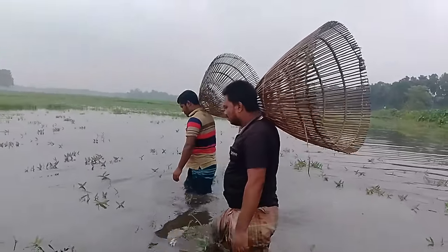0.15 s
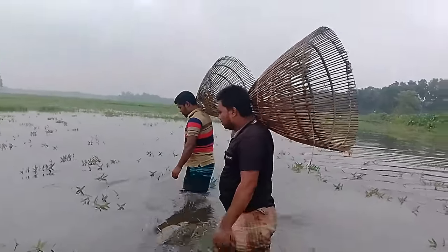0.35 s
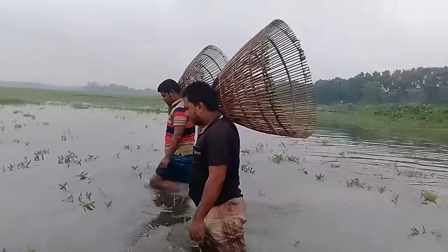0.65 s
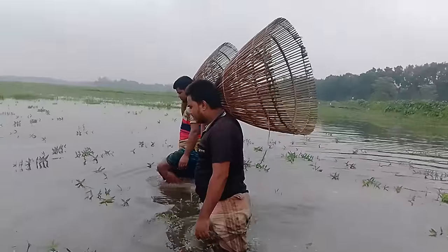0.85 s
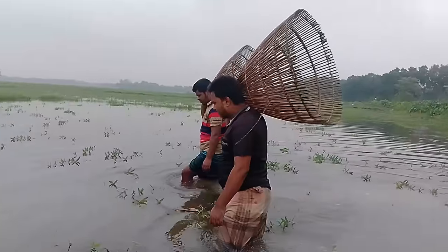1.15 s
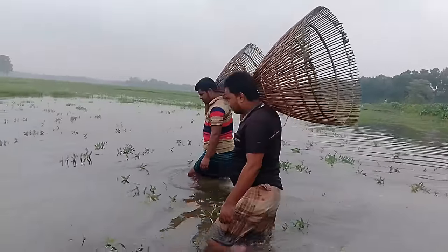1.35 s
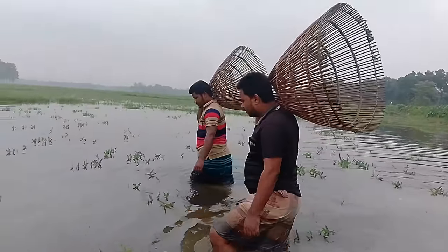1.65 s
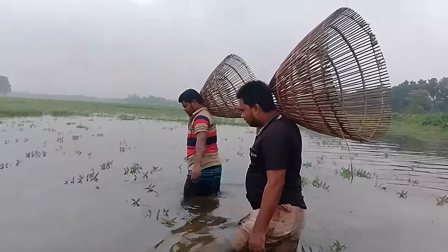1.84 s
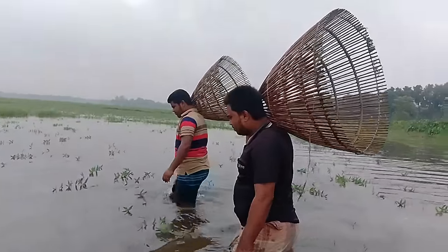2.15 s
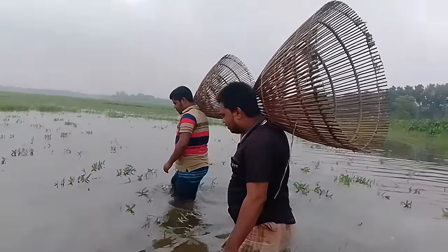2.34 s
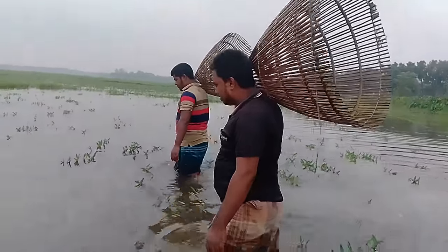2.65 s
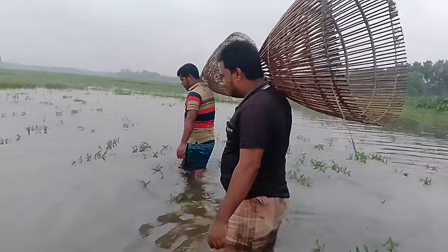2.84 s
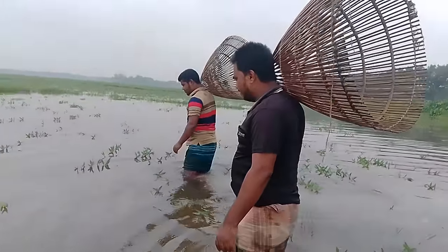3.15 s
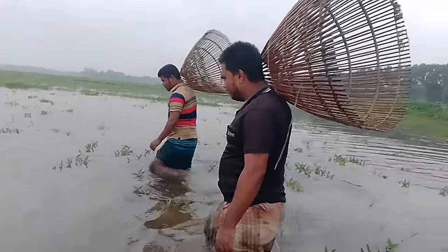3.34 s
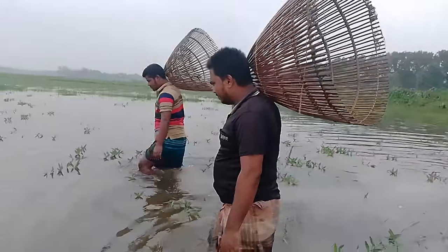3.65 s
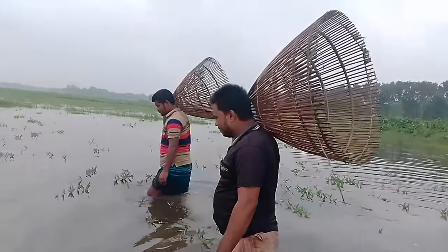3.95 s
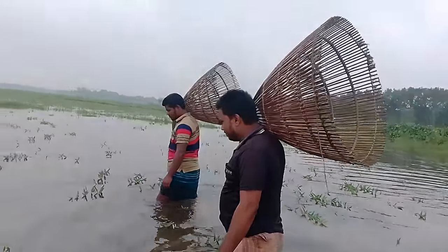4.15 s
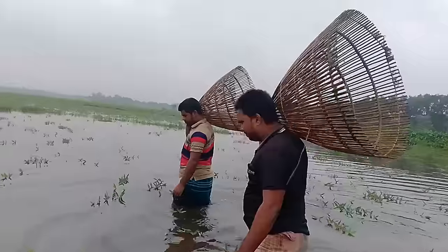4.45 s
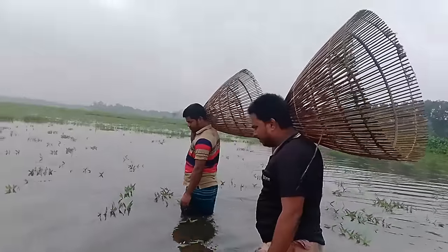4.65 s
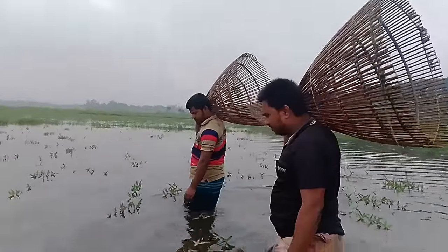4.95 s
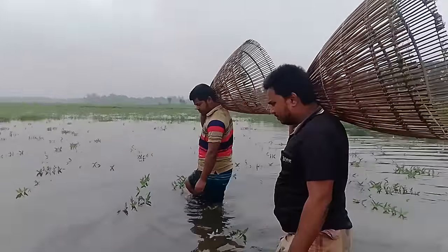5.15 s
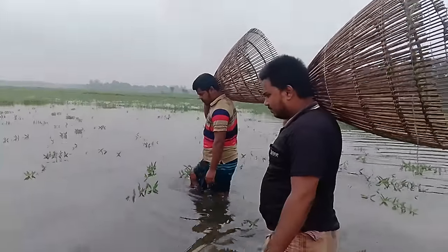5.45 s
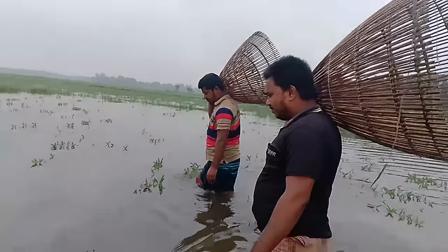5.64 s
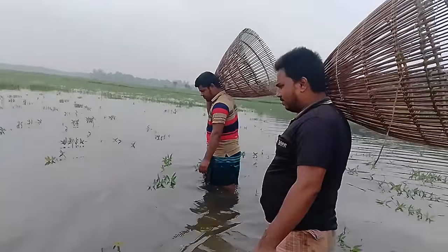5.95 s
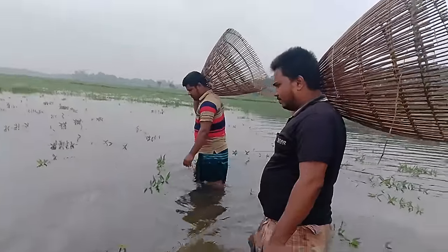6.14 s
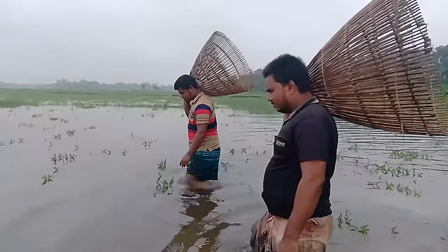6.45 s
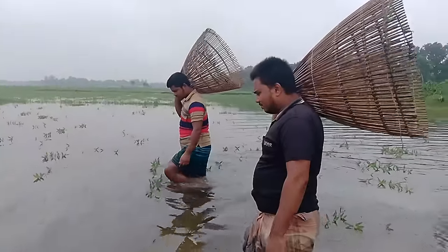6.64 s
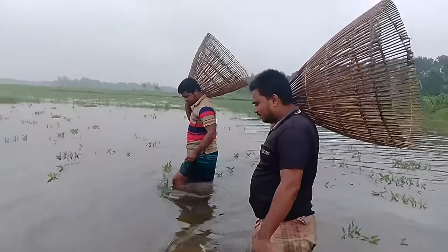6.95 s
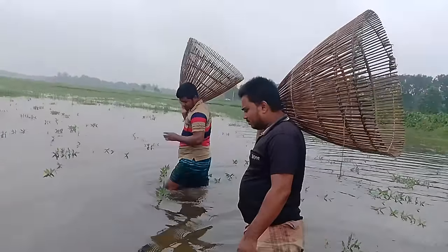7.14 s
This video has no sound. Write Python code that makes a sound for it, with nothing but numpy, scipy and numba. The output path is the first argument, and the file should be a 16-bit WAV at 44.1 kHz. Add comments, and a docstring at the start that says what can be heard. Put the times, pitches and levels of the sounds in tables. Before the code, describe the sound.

People wade slowly through thigh-deep water outdoors. A splash with a sharp little slap comes first, then uneven strides follow, each a soft slosh with gurgling bubbles, trickles and crisp droplet ticks. Gentle lapping fills the short lulls. A faint steady hiss runs underneath, and a light breeze now and then rumbles on the nearby microphone.

```python
"""Wading through floodwater

Two people wade slowly through thigh-deep water in an open field. Each stride traps air pockets that
ring as damped oscillators, mostly rising in pitch, sheds trickles and spray, and bursts films with a
snap. A light breeze buffets the small microphone, whose port resonates near 10 kHz and lifts the
steady hiss there."""
import sys
import numpy as np
from scipy import signal
from scipy.fft import rfft, irfft
from scipy.io import wavfile
from numba import njit

SR = 44100
rng = np.random.default_rng(int(sys.argv[2]) if len(sys.argv) > 2 else 0)


def waveform_to_disk(signal):
    """Save audio, clipped to [-1, 1], as 16-bit WAV at the path in sys.argv[1]."""
    frames = np.transpose(np.atleast_2d(signal))
    scaled = np.clip(frames, -1, 1) * 32767
    samples = np.round(scaled).astype(np.int16)
    wavfile.write(sys.argv[1], SR, samples)


N = 321930


def from_db(db):
    """Amplitude ratio of a level: tenfold for every 20 dB."""
    return 10 ** (np.asarray(db) / 20)


def rms_one(x):
    """Normalisation to unit mean power."""
    return x / np.sqrt(np.mean(x ** 2) + 1e-20)


def band(x, low_hz, high_hz, order=2):
    """Butterworth band-pass: maximally flat between its edges."""
    return signal.sosfilt(signal.butter(order, [low_hz, high_hz], "band", fs=SR, output="sos"), x)


def drift(corner_hz):
    """Slow random fluctuation: low-passed noise of unit rms."""
    hop, settle = 40, 2000
    pole = np.exp(-2 * np.pi * corner_hz * hop / SR)
    noise = rng.standard_normal(N // hop + settle + 2)
    slow = signal.lfilter([1], [1, -2 * pole, pole * pole], noise)[settle:]
    return np.interp(np.arange(N) / hop, np.arange(len(slow)), rms_one(slow))


def resonance(x, hz, width_hz):
    """Driven damped oscillator: two poles, unit gain at the peak."""
    r = np.exp(-np.pi * width_hz / SR)
    gain = (1 - r * r) / 2
    return signal.lfilter([gain, 0, -gain], [1, -2 * r * np.cos(2 * np.pi * hz / SR), r * r], x)


def port(x):
    """Cavity resonance: the air in the microphone port rings at two close treble frequencies."""
    # (frequency [Hz], bandwidth before the 700 Hz floor [Hz], gain of the resonant part [dB])
    port_modes = [(9350, 640, 14), (10280, 730, 14.5)]
    for hz, width_hz, gain_db in port_modes:
        x = x + from_db(gain_db) * resonance(x, hz, max(width_hz, 700))
    return x


@njit
def ringing(rows, rise, fade, bend):
    """Damped bubble oscillation: sines that swell fast, glide in pitch and die away."""
    out = np.zeros(N)
    for onset_s, length_s, first_hz, last_hz, gain in rows:
        start, phase, steps = int(onset_s * SR), 0., length_s * SR
        for i in range(min(int(1.5 * steps), N - start)):
            age = i / steps
            phase += 2 * np.pi * first_hz * (last_hz / first_hz) ** min(age ** bend, 1.2) / SR
            envelope = min(age / rise, 1.) * np.exp(-fade * age - age ** 6)
            out[start + i] += gain * envelope * np.sin(phase)
    return out


def swells(starts, holds, peaks_db, rise_db_per_s, fall_db_per_s, rest_db):
    """Incoherent addition: powers of events that rise, hold and decay sum to a level in dB."""
    t = np.arange(0, N, 64) / SR
    power = from_db(rest_db) ** 2
    for start, hold, db in zip(starts, holds, peaks_db):
        before, after = np.maximum(start - t, 0), np.maximum(t - start - hold, 0)
        power = power + from_db(db - rise_db_per_s * before - fall_db_per_s * after) ** 2
    return np.interp(np.arange(N) / SR, t, 10 * np.log10(power))


def swarm(level_db, per_s, band_hz, cycles, spread_db, smooth_db, clumping_db):
    """Superposition: random bubbles ring in clumps over the rush of those too many to tell apart."""
    low_hz, high_hz = band_hz
    when, pitch, life, lift, strength = rng.random((30000, 5))[:int(per_s * N / SR)].T
    hz = low_hz * (high_hz / low_hz) ** pitch
    length_s = cycles * (0.077 + 2.87 * life ** 2) / hz
    glide = 1 + 0.19 * lift ** 3   # a bubble near the surface rises in pitch
    gain = from_db(spread_db * np.minimum(-np.log(1 - strength), 2.8))
    rows = np.stack([when * N / SR, length_s, hz, hz * glide, gain], 1)
    grains = ringing(rows, rise=0.11, fade=1.22, bend=0.74)
    clumps_db = clumping_db * np.clip(drift(12), -2, 1.3)
    grains = rms_one(port(from_db(clumps_db) * grains))
    rush = band(rng.standard_normal(N), low_hz, high_hz, order=4)
    rush = rms_one(port(from_db(clumps_db / 2) * rush))
    share = from_db(smooth_db + 0.24 * (level_db - level_db.mean()))   # more rush in a hard stride
    return from_db(level_db) * (grains + share * rush) / np.sqrt(1 + share ** 2)


def wading():
    """Air entrainment: each surge pushed by a leg raises bubble swarms, the smallest ringing highest."""
    # (time of full strength [s], hold [s], slosh [dB], trickle [dB], spray [dB], fizz [dB])
    surges = [(0.0, 0.042, -47, -46.5, -45, -44), (0.148, 0.01, -55, -49, -51.5, -52.5),
              (0.882, 0.035, -52.5, -53, -54, -52), (1.016, 0.0067, -54.5, -55, -51.5, -46),
              (1.268, 0.059, -53, -54.5, -61, -50), (1.438, 0.019, -56, -57.5, -61, -49),
              (1.54, 0.038, -47.5, -61, -86, -60), (2.413, 0.16, -54, -60, -68.5, -53.5),
              (2.807, 0.096, -52, -62, -60.5, -46.5), (2.95, 0.24, -56, -57.5, -68.5, -56),
              (3.415, 0.22, -63, -70, -99, -62), (3.78, 0.078, -53, -57, -77, -48),
              (3.92, 0.12, -55.5, -58.5, -52.5, -52.5), (4.102, 0.16, -51.5, -54.5, -53, -50),
              (4.24, 0.19, -52.5, -55.5, -67, -51.5), (4.76, .25, -63, -79.5, -89, -67),
              (5.288, 0.21, -60.5, -71.5, -80, -60.5), (5.77, 0.2, -52, -58.5, -72.5, -52),
              (6.64, 0.013, -56.5, -76, -68, -48), (6.73, .06, -78, -64.5, -76, -52),
              (7.0, 0.027, -70, -84, -90, -82)]
    # each lists (slosh, trickle, spray, fizz): growth [dB/s], decay [dB/s], level between surges [dB]
    rises = (104, 126, 148, 120)
    falls = (52.7, 79, 86.4, 55.6)
    lapping = (-66.5, -78, -80, -61)
    starts, holds, *peaks_db = np.transpose(surges)
    levels = [swells(starts, holds, *layer) for layer in zip(peaks_db, rises, falls, lapping)]
    slosh_db, trickle_db, spray_db, fizz_db = levels
    slosh = swarm(slosh_db, per_s=350.5, band_hz=(307.5, 1387), cycles=14,
                  spread_db=6.5, smooth_db=-7.5, clumping_db=3.5)
    trickle = swarm(trickle_db, per_s=608, band_hz=(1236, 2607), cycles=8.5,
                    spread_db=9.5, smooth_db=-6, clumping_db=5.5)
    spray = swarm(spray_db, per_s=1602, band_hz=(2601, 7520), cycles=9,
                  spread_db=7, smooth_db=-9, clumping_db=5)
    fizz = swarm(fizz_db, per_s=2496, band_hz=(7023, 15812), cycles=6.5,
                 spread_db=7.5, smooth_db=-6, clumping_db=4.5)
    # flying droplets land with ticks too short to have a pitch
    spatter = swarm(fizz_db - 11, per_s=130, band_hz=(4000, 15500), cycles=3,
                    spread_db=5, smooth_db=-20, clumping_db=3)
    return slosh + trickle + spray + fizz + spatter


def hiss():
    """Stationary noise: far water, air and the microphone's own noise, coloured by the port."""
    # spectrum ahead of the port: (frequency [Hz], relative spectral density [dB])
    spectrum = [(200, 7.5), (400, 10), (1100, 5.5), (1500, -55), (3000, -15.5), (7500, -22), (8800, -30),
                (9300, -16.5), (10500, -10.5), (11000, -36), (16000, -19)]
    knots_hz, knots_db = np.transpose(spectrum)
    hz = np.maximum(np.fft.rfftfreq(N, 1 / SR), 1)
    shape_db = np.interp(np.log(hz), np.log(knots_hz), knots_db)
    noise = irfft(rfft(rng.standard_normal(N)) * from_db(shape_db), N)
    return from_db(-57.5) * rms_one(port(noise))


def breeze():
    """Turbulent pressure: gusts on the microphone make an uneven rumble with a thin upper fringe."""
    # (time of full strength [s], hold [s], level [dB])
    gusts = [(0.055, 0.24, -51), (0.591, 0.091, -55), (1.677, 0.028, -58), (2.11, 0.11, -62),
             (2.41, 0.12, -57.5), (3.357, 0.096, -61.5), (3.85, 0.029, -44), (3.93, .05, -55),
             (4.176, 0.023, -62), (4.473, 0.24, -63.5), (5.153, 0.0083, -57), (6.88, 0.031, -67)]
    level_db = swells(*np.transpose(gusts), rise_db_per_s=400, fall_db_per_s=354, rest_db=-74)
    rumble = rms_one(band(rng.standard_normal(N), 51.5, 111.0, order=3))
    fringe = rms_one(band(rng.standard_normal(N), 169, 286))
    return from_db(level_db + 1.04 * drift(45)) * (rumble + from_db(-3.5) * fringe)


def bubbles():
    """Bubble resonance: the louder air pockets ring one by one, unevenly as their walls wobble."""
    # (time [s], length [s], first frequency [Hz], last frequency [Hz], level before wobble [dB])
    air_pockets = [(0.021, 0.011, 1030, 1330, -33.5), (0.046, 0.0017, 2480, 2640, -30.5),
                   (0.049, 0.0077, 2830, 2600, -36), (0.094, 0.022, 660, 605, -46),
                   (0.511, 0.012, 620, 716, -45), (0.804, 0.023, 1706, 1940, -49),
                   (0.817, 0.0078, 1220, 1310, -42.5), (0.881, 0.0084, 667, 555, -29.5),
                   (0.888, 0.023, 580, 595, -39.5), (0.917, 0.0068, 1750, 1770, -44),
                   (1.254, 0.0053, 1480, 1520, -34), (1.263, 0.014, 1384, 1360, -47),
                   (1.281, 0.026, 865, 750, -46), (1.285, 0.0032, 4240, 4280, -40),
                   (1.34, 0.01, 675, 580, -38), (1.484, 0.004, 1690, 1720, -38),
                   (1.501, 0.007, 1190, 1170, -34.5), (1.538, 0.032, 365, 387, -39.5),
                   (1.539, 0.0096, 1230, 1240, -44), (2.317, 0.014, 1280, 1360, -51.5),
                   (2.48, 0.013, 413, 540, -47), (2.512, 0.051, 377, 487, -42.5),
                   (2.575, 0.038, 530, 860, -46), (2.834, 0.053, 394, 448, -53),
                   (2.841, 0.0046, 6630, 7500, -37), (2.889, 0.022, 1680, 2060, -45.5),
                   (2.89, 0.041, 655, 1270, -48.5), (3.015, 0.091, 523, 473, -47.5),
                   (3.131, 0.0083, 500, 473, -41.5), (3.179, 0.003, 4670, 4970, -39.5),
                   (3.221, 0.029, 1030, 885, -46), (3.795, 0.0052, 680, 545, -40.5),
                   (3.867, 0.012, 242, 288, -30), (3.875, 0.008, 1510, 1440, -40.5),
                   (3.975, 0.0044, 2960, 2980, -35), (4.103, 0.046, 633, 1316, -49),
                   (4.224, 0.018, 550, 493, -46), (4.269, 0.0051, 815, 800, -37.5),
                   (4.352, 0.0036, 3060, 3140, -40.5), (4.363, 0.0089, 895, 900, -40),
                   (4.499, 0.038, 470, 740, -43), (4.5, 0.0094, 1310, 1210, -39.5),
                   (4.642, 0.023, 1590, 2200, -52), (4.693, 0.026, 1705, 1820, -53.5),
                   (4.825, 0.018, 755, 860, -51), (4.882, 0.017, 543, 600, -49),
                   (5.087, 0.013, 990, 1150, -48.5), (5.305, 0.013, 906, 845, -46),
                   (5.318, 0.066, 349, 743, -47.5), (5.353, 0.023, 1010, 890, -52),
                   (5.417, 0.0061, 1890, 2370, -54), (5.463, 0.0021, 1480, 1450, -41.5),
                   (5.485, 0.065, 370, 390, -50), (5.755, 0.017, 730, 805, -40.5),
                   (5.758, 0.093, 371, 733, -50), (5.77, 0.0052, 2870, 2470, -41.5),
                   (5.823, 0.015, 773, 860, -45), (5.832, 0.005, 2160, 2280, -39),
                   (5.98, 0.015, 540, 557, -42), (6.089, 0.0092, 1180, 1420, -43.5),
                   (6.604, 0.049, 369, 517, -38.5), (6.604, 0.023, 1060, 1170, -48),
                   (6.552, 0.013, 690, 590, -48.5), (6.704, 0.026, 1160, 1370, -52),
                   (7.165, .06, 422, 583, -56.5), (6.649, 0.01, 506, 600, -50.5),
                   (6.738, 0.023, 1010, 1140, -48.5), (6.776, 0.026, 793, 850, -43.5),
                   (6.777, 0.015, 1260, 1330, -46.5), (6.788, 0.0029, 3750, 3620, -45),
                   (6.904, 0.011, 1670, 1770, -53)]
    rows = np.array(air_pockets, float)
    rows[:, 4] = from_db(rows[:, 4])
    wobble = from_db(2.5 * drift(42))
    return wobble * ringing(rows, rise=0.04, fade=0.4, bend=1.41)


def snaps():
    """Impulse excitation: a bursting film rings the port, and its droplet knocks at its own pitch."""
    # (time [s], peak level of the crack [dB], knock relative to the crack [dB])
    film_bursts = [(0.027, -30, -10), (0.05, -39, -20), (.068, -33, -3), (.084, -27, -14),
                   (0.124, -24.5, -13), (0.171, -13, -9.5), (0.193, -28, -18), (0.1964, -27.5, -12),
                   (0.266, -38, -6), (0.328, -46, -20), (0.7688, -30, -9.5), (0.8743, -28, -26),
                   (0.8967, -29, -8), (0.916, -25.5, -11), (1.281, -29.5, -10), (1.3405, -25.5, -10),
                   (1.379, -26.5, -19), (2.235, -36.5, -12.5), (2.426, -31.5, -39), (2.7722, -25, -26),
                   (2.841, -26.5, -16), (2.858, -28, -11.5), (3.1714, -40, -7), (3.191, -27, -21),
                   (3.238, -27.5, -29), (3.323, -47, 2), (3.681, -33, -20), (3.758, -25, -33),
                   (3.9748, -25, -5), (4.0891, -31, -14), (4.1972, -27, -8.5), (4.346, -31.5, -7),
                   (4.8953, -32, -39), (5.7638, -22, -19), (6.203, -32.5, -34), (6.2379, -34, -35),
                   (6.591, -31, -9), (6.597, -21.5, -24.5), (6.64, -23, -42), (6.6484, -28, -37),
                   (6.671, -31, -16), (6.7098, -26.5, -35), (6.715, -30, -15), (6.7759, -45.5, 7),
                   (6.787, -28, -17), (7.144, -36, -19)]
    size = 600
    out, t = np.zeros(N + size), np.arange(size) / SR
    envelope = np.exp(-np.abs(t - .0012) / 0.00071)
    noises = rng.standard_normal((len(film_bursts), 2, size))
    droplets_hz = rng.uniform(3500, 7500, len(film_bursts))
    for (onset_s, db, knock_db), noise, hz in zip(film_bursts, noises, droplets_hz):
        crack = port(band(noise[0] * envelope, 7840, 13200))
        knock = resonance(band(noise[1] * envelope, 1900, 8500), hz, width_hz=3300)
        snap = crack / np.abs(crack).max() + from_db(knock_db) * knock / np.abs(knock).max()
        start = int(onset_s * SR)
        out[start:start + size] += from_db(db) * snap
    return out[:N]


def slaps():
    """Free decay of a cavity: water slaps close by with a sudden suction, then a few swings."""
    # (time [s], level before the low-pass [dB], frequency [Hz], time to decay by 60 dB [s])
    cavities = [(0.1251, -13.5, 900, 0.0016), (.146, -33, 370, 0.025), (0.158, -28.5, 435, 0.067),
                (0.1645, -7, 523, 0.0013), (0.1727, -9.5, 593, 0.0064), (6.7759, -34, 1500, 0.0023)]
    out, t = np.zeros(N), np.arange(2000) / SR
    for onset_s, db, hz, t60 in cavities:
        start = int(onset_s * SR)
        out[start:start + len(t)] -= from_db(db - 60 * t / t60) * np.sin(2 * np.pi * hz * t + .5)
    return signal.sosfilt(signal.butter(1, 5000, fs=SR, output="sos"), out)   # softens the edge


def scene():
    """Linear superposition: water, hiss and wind add at one microphone."""
    return (wading() + bubbles() + snaps() + slaps() + hiss() + breeze())[None]


def record(dry):
    """Band limiting: a narrow notch in the upper bass, then a steep low-pass."""
    notch_depth, cutoff_hz = .85, 15900
    dipped = dry - notch_depth * resonance(dry, hz=165, width_hz=70)
    return signal.sosfilt(signal.ellip(10, .5, 60, cutoff_hz, fs=SR, output="sos"), dipped)


dry = scene()
out = record(dry)
waveform_to_disk(out)
```